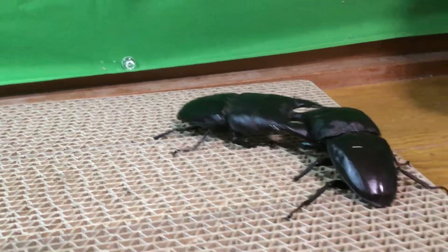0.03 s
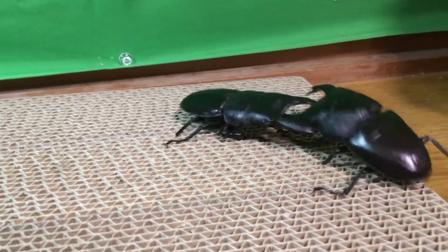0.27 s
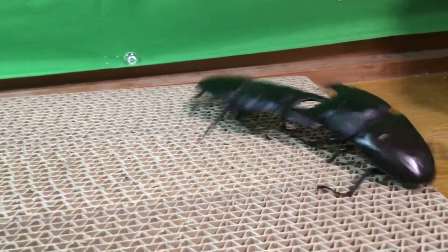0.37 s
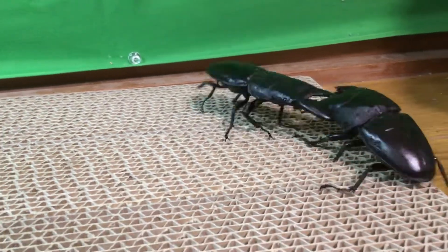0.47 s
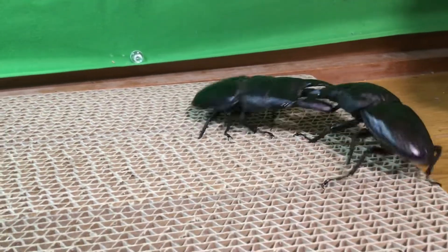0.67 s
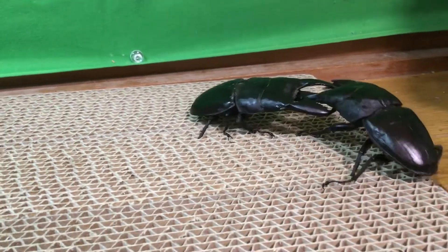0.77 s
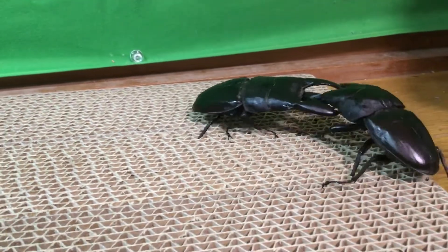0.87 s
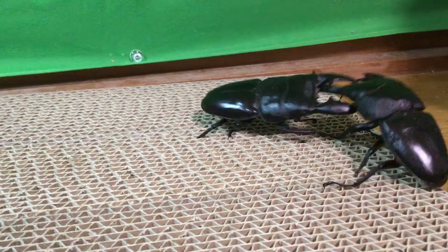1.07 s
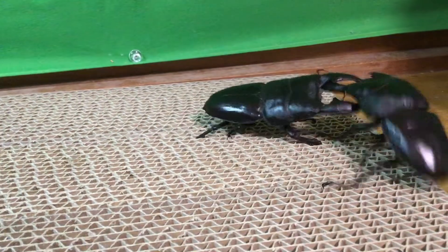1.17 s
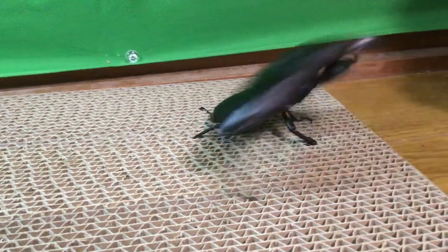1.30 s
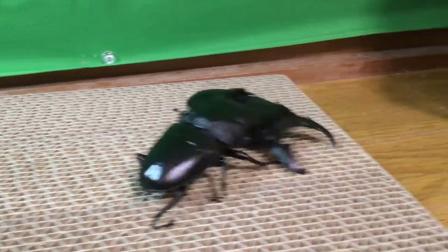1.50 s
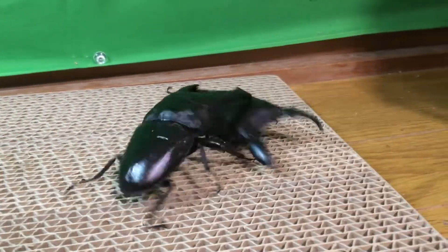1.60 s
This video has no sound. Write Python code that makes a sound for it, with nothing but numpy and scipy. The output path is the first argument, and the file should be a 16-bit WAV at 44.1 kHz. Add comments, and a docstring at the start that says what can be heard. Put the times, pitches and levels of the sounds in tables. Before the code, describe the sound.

Two stag beetles grapple close up, with dry jaw clicks and claws scratching a woven mat. Clicks and soft table knocks build to the sharpest snap at about 0.4 seconds, then thin to scattered ticks. From 0.9 seconds the clicking picks up again, with brief hissing scrapes around 1.2 and a low bump near 1.35. Light scrabbling continues to about 1.6 seconds over a faint room hum.

```python
"""Stag beetles wrestling on a table

Two stag beetles fight on a woven mat on a wooden table, close to the microphone. Their jaws snap and
slip on hard shell, claws catch and scrape in the weave, and their bodies knock and bump the table.
Behind them a small room with a low electrical hum answers softly."""
import sys
import numpy as np
from scipy import signal
from scipy.fft import rfft, irfft, next_fast_len
from scipy.io import wavfile
from scipy.ndimage import uniform_filter1d

SR = 44100
rng = np.random.default_rng(int(sys.argv[2]) if len(sys.argv) > 2 else 0)


def wrap_up_sound(samples):
    """Save the sound to the file named by the first command line argument, as 16-bit audio."""
    columns = np.atleast_2d(samples).T
    # keep every value between -1 and 1, then stretch to whole-number steps
    tamed = np.clip(columns, -1, 1)
    steps = np.round(tamed * 32767).astype(np.int16)
    wavfile.write(sys.argv[1], SR, steps)


N = 72765
T = np.arange(N) / SR
CLICK_GAIN = np.sqrt(.0025 * SR)  # gives a click of unit energy an rms of one over 2.5 ms

# Spectrum of the rumbling mat (frequency [Hz], gain [dB])
MAT_SPECTRUM = [(40, -53), (70, -8), (220, 2.5), (400, -11.5), (610, -6.5), (900, -25), (8000, -82)]
# How hard the claws drag through the weave (time [s], level [dB])
CLAW_EFFORT = [(0, -61.5), (.14, -54), (.30, -68), (.34, -49), (.415, -70), (.488, -56.5), (.56, -66.5),
               (.90, -72), (.99, -52), (1.075, -63.5), (1.19, -55.5), (1.31, -60.5), (1.35, -57.5),
               (1.65, -57)]
# Spectrum of ringing shell (frequency [Hz], gain [dB])
SHELL_SPECTRUM = [(100, -31), (600, -10), (1400, 5), (2100, 7), (2900, 2.5), (5300, -3), (6300, -6.5),
                  (7100, -30), (16000, -50)]
# Spectrum of the crack of a slipping tip (frequency [Hz], gain [dB])
CRACK_SPECTRUM = [(2000, -36), (6000, 3.5), (10500, 10), (15500, 4.5)]


def undb(db):
    """Decibels to gain."""
    return 10 ** (np.asarray(db) / 20)


def unit_energy(x):
    """Scale to an energy of one."""
    return x / np.sqrt(np.sum(x ** 2) + 1e-20)


def unit_rms(x):
    """Scale to an rms of one."""
    return x / np.std(x)


def colour(x, points, hz=None, octaves=1., skirt=0.):
    """Filter by (frequency [Hz], gain [dB]) points and/or a broad resonance at hz on a flat skirt."""
    size = next_fast_len(len(x))
    pitch = np.log2(np.maximum(np.fft.rfftfreq(size, 1 / SR), 1))
    gain = 1
    if points is not None:
        point_hz, point_db = np.array(points, float).T
        gain = undb(np.interp(pitch, np.log2(point_hz), point_db))
    if hz is not None:
        gain = gain * (skirt + np.exp(-.5 * ((pitch - np.log2(hz)) / octaves) ** 2))
    return irfft(rfft(x, size) * gain, size)[:len(x)]


def envelope(points):
    """Gain over time from (time [s], level [dB]) points."""
    return undb(np.interp(T, *np.array(points).T))


def burst(t, decay_s):
    """Noise that starts at t = 0 and dies away, evened out so that it has no pitch of its own."""
    fade = (t > 0) * np.exp(-np.abs(t) / decay_s)
    spectrum = rfft(rng.standard_normal(len(t)) * fade)
    power = uniform_filter1d(np.abs(spectrum) ** 2, size=max(int(len(t) / SR / decay_s / 2), 1))
    return unit_energy(irfft(spectrum / np.sqrt(power + 1e-12), len(t)) * (t > 0))


def add(out, start_s, x):
    """Mix a short sound in."""
    i = max(int(round(start_s * SR)), 0)
    out[i:i + len(x)] += x[:N - i]


def room_tone():
    """Still room air and the hum of an appliance."""
    # Tones of the hum (frequency [Hz], rms level [dB])
    hum_tones = [(59.5, -69.5), (120, -59.5), (172, -66)]
    # Spectrum of the air (frequency [Hz], gain [dB])
    air_spectrum = [(50, -16), (170, 19), (330, 9.5), (1100, -1.5), (3000, -4.5), (7000, -17), (16000, -21)]
    hum = sum(undb(db) * np.sqrt(2) * np.sin(2 * np.pi * (hz * T + rng.random())) for hz, db in hum_tones)
    air = undb(-63) * unit_rms(colour(rng.standard_normal(N), air_spectrum))
    return hum + air


def room_reverb(x, delay_s=.0072, t60_s=.23):
    """The short diffuse answer of a small room, faint with the microphone so close to the source."""
    tail = burst(T[:SR // 2] - delay_s, t60_s / np.log(1000))
    return undb(-20.5) * signal.fftconvolve(x, tail)[:N]


def fibre_catches(per_s=5500, spread_db=2.8):
    """Dense tiny catches of claws on fibres, a few much stronger than the rest."""
    sizes = undb(spread_db * np.minimum(rng.exponential(size=N), 5))
    return (rng.random(N) < per_s / SR) * sizes * rng.choice([-1, 1], N)


def scrabble():
    """Claws rasp over the weave while the mat rumbles under shifting feet."""
    # Spectrum of claws on the weave (frequency [Hz], gain [dB])
    rasp_spectrum = [(350, -10), (1300, 4.5), (4000, 0.5), (7000, -14.5), (16000, -19.5)]
    # Rumble under the feet (time [s], level [dB])
    shuffle = [(0, -49.5), (.37, -53), (.56, -63.5), (.90, -64.5), (1.15, -55), (1.38, -52), (1.51, -50.5),
               (1.65, -68.5)]
    rasp = unit_rms(colour(fibre_catches(), rasp_spectrum)) * envelope(CLAW_EFFORT)
    rumble = unit_rms(colour(fibre_catches(), MAT_SPECTRUM)) * envelope(shuffle)
    return rasp + rumble


def skids(snag_s=.002, snag_db=3.5):
    """A skid hisses in a broad high band that swells and fades, stuttering as it snags on threads."""
    # Claws and shell sliding over the mat (middle [s], half length [s], level [dB], centre [Hz])
    slides = [(0.494, 0.014, -58, 7460), (0.625, 0.0085, -67, 7850), (1.188, 0.0024, -42.5, 8450),
              (1.211, 0.019, -49.5, 8300), (1.267, .003, -50.5, 10500), (1.276, 0.029, -55, 8140),
              (1.404, 0.0026, -53, 8750), (1.472, 0.019, -60, 9700), (1.555, 0.021, -56, 7040)]
    out = np.zeros(N)
    for at, half_s, db, hz in slides:
        grip = unit_rms(uniform_filter1d(rng.standard_normal(N), size=int(snag_s * SR)))
        snags = undb(snag_db * grip.clip(-2, 2))
        hiss = colour(rng.standard_normal(N), None, hz, octaves=.44, skirt=.27)
        swell = np.exp(-((T - at) / half_s) ** 2)
        out += undb(db) * swell * unit_rms(snags * hiss)
    return out


def claw_ticks(per_s=75, decay_s=.00081):
    """Single claws catch and let go at random, each at its own pitch, louder as the legs push harder."""
    out, effort = np.zeros(N), envelope(CLAW_EFFORT)
    t = T[:SR // 50] - T[SR // 400]
    count = int(per_s * N / SR)
    for place, (size, pitch) in zip(rng.random(count), rng.standard_normal((count, 2)).clip(-2, 2)):
        i = int(place * N)
        hz = 3200 * 2 ** (.42 * pitch)
        ring = unit_energy(colour(burst(t, decay_s), SHELL_SPECTRUM, hz, octaves=.3, skirt=.16))
        crack = undb(-14) * unit_energy(colour(burst(t, decay_s), CRACK_SPECTRUM))
        strength = effort[i] * undb(2 + 2 * size)
        add(out, i / SR, CLICK_GAIN * strength * (ring + crack))
    return out


def body_thumps(rise_s=.003, slap_decay_s=.0093):
    """A body lands on the mat: a couple of low, damped cycles of the table and a soft slap."""
    # Bumps on the table (time [s], level [dB], pitch [Hz])
    bumps = [(0.380, -37, 179), (0.447, -35.5, 121), (0.494, -37, 244), (0.537, -38, 160),
             (1.182, -36, 182), (1.355, -26.5, 170), (1.474, -33.5, 185)]
    out, t = np.zeros(N), T[:SR // 10]
    swell = t / rise_s * np.exp(1 - t / rise_s)
    slap_shape = np.exp(-t / slap_decay_s) * np.minimum(t / rise_s, 1)
    for at, db, hz in bumps:
        slap = unit_rms(colour(rng.standard_normal(len(t)), MAT_SPECTRUM)) * slap_shape
        thud = swell * np.sin(2 * np.pi * hz * t)
        add(out, at, undb(db) * (undb(-6) * slap - thud))
    return out


def table_knocks(t60_s=.049):
    """The wooden top rings briefly, a little differently at each strike, duller under a soft blow."""
    # Legs and bodies striking the wood through the mat (time [s], peak level [dB])
    blows = [(0.335, -33), (0.352, -33), (0.4383, -24), (0.484, -31), (.5365, -40.5), (0.737, -35.5),
             (0.934, -38), (1.0162, -33.5), (1.124, -41), (1.3213, -34), (1.3433, -28), (1.351, -35)]
    # Modes of the table top (frequency [Hz], relative level [dB])
    modes = [(400, -3), (565, 0), (770, 3), (880, 0.5), (1130, -1.5), (1250, -2)]
    out, t = np.zeros(N), T[:SR // 10]
    hardest_db = max(db for at, db in blows)
    decay = np.exp(-np.log(1000) * t / t60_s)
    for at, db in blows:
        tilt_db_per_octave = .21 * (db - hardest_db)
        ring = np.zeros(len(t))
        for hz, mode_db in modes:
            gain = undb(mode_db + tilt_db_per_octave * np.log2(hz / modes[0][0]))
            ring += gain * np.sin(2 * np.pi * (hz * t + rng.random()))
        add(out, at, undb(db) * ring / np.abs(ring).max() * decay)
    return out


def jaw_snaps(chatter_s=.0026, lag_s=.0006):
    """Each snap is one sharp push and a few ms of chatter that ring the shell, with a thin crack on top."""
    # Snaps of jaws and claws (time [s], ring level [dB], centre [Hz], width [octaves], crack level [dB])
    snaps = [ (0.0489, -44.5, 4330, 0.55, -56), (0.0965, -39.5, 2390, 0.71, -62),
             (0.111, -71, 3000, .8, -49), (0.133, -46.5, 3900, 1, -41.5), (0.1554, -38.5, 3350, 0.27, -64),
             (0.2472, -26, 3060, 0.36, -50), (0.2884, -42.5, 2760, 0.87, -57.5),
             (0.3262, -31.5, 3400, 0.43, -54.5), (0.3534, -29, 4040, 0.47, -65),
             (0.3845, -45, 2800, 0.65, -55), (0.4387, -15, 3640, 0.54, -37),
             (0.483, -28.5, 2920, 0.75, -51), (0.6389, -52.5, 4230, 0.85, -68),
             (0.6868, -54.5, 3160, 0.68, -80), (0.7188, -42, 3500, 0.51, -62),
             (0.737, -34.5, 2530, 0.47, -57.5), (0.7903, -49, 3300, 0.51, -67.5),
             (0.8142, -58.5, 4570, 0.45, -70), (0.9347, -31, 3800, 0.58, -49),
             (1.0147, -32, 2750, 0.33, -51.5), (1.0173, -32, 2400, 0.63, -52),
             (1.0923, -44.5, 2900, 0.82, -56), (1.1234, -41, 2550, 0.5, -56),
             (1.1409, -43, 3160, 0.68, -54), (1.174, -28, 3460, 0.29, -52.5),
             (1.3222, -34.5, 3030, 0.52, -51.5), (1.342, -34.5, 2900, 0.53, -46.5),
             (1.3576, -41.5, 5650, 0.41, -39), (1.474, -45, 2510, 0.9, -63), (1.499, -48, 3830, 1, -64.5)]
    # Light contacts skid, hard snaps let go cleanly (ring level [dB], chatter relative to the push [dB])
    chatter_levels = [(-36, 1), (-27, -6)]
    t = T[:SR // 20] - T[SR // 200]
    out, push = np.zeros(N), 1. * (t == 0)
    for at, ring_db, hz, octaves, crack_db in snaps:
        chatter_db = np.interp(ring_db, *np.array(chatter_levels).T)
        blow = push + undb(chatter_db) * burst(t - lag_s, chatter_s)
        ring = unit_energy(colour(blow, SHELL_SPECTRUM, hz, octaves, skirt=.16))
        slip = push + undb(-1) * burst(t, chatter_s)
        crack = unit_energy(colour(slip, CRACK_SPECTRUM))
        add(out, at + t[0], CLICK_GAIN * (undb(ring_db) * ring + undb(crack_db) * crack))
    return out


def scene():
    """The fight close to one microphone, with the room behind it."""
    fight = jaw_snaps() + table_knocks() + body_thumps() + scrabble() + skids() + claw_ticks()
    return (fight + room_reverb(fight) + room_tone())[None]


def record(dry):
    """The recorder cuts the deep bass and the highest treble."""
    low_cut = signal.butter(4, 42.4, "high", fs=SR, output="sos")
    high_cut = signal.ellip(10, .2, 70, 16200, fs=SR, output="sos")
    return signal.sosfilt(high_cut, signal.sosfilt(low_cut, dry))


dry = scene()
out = record(dry)
wrap_up_sound(out)
```